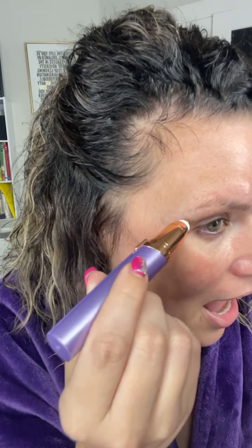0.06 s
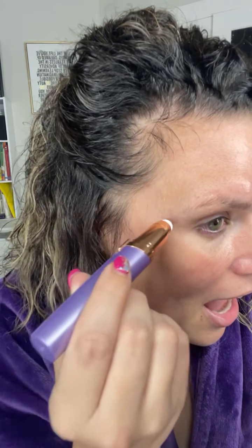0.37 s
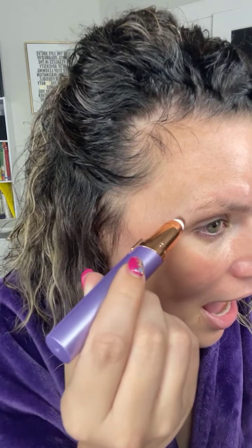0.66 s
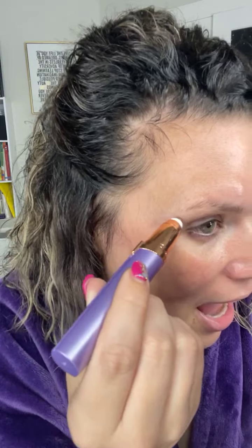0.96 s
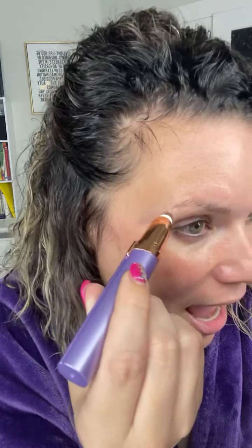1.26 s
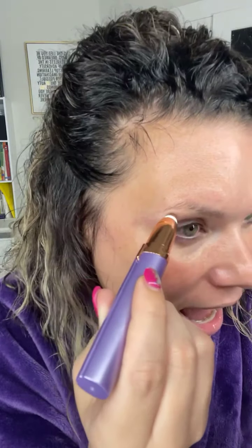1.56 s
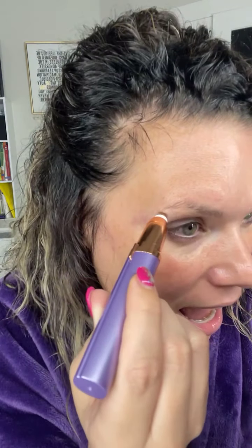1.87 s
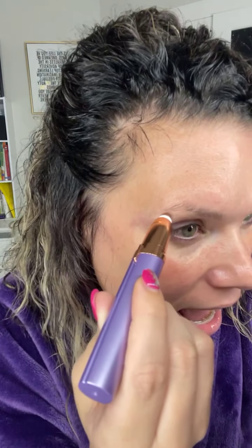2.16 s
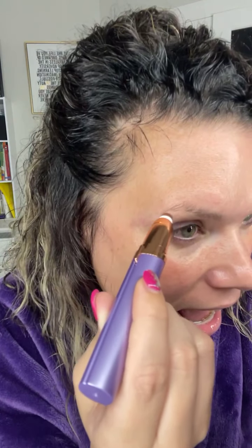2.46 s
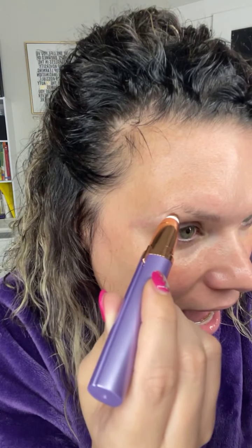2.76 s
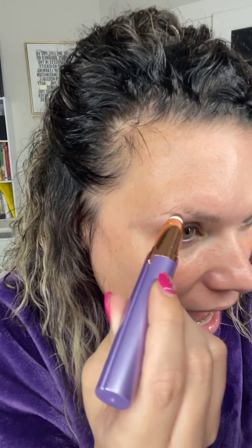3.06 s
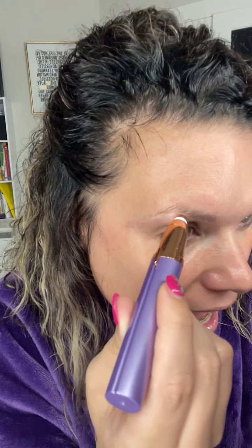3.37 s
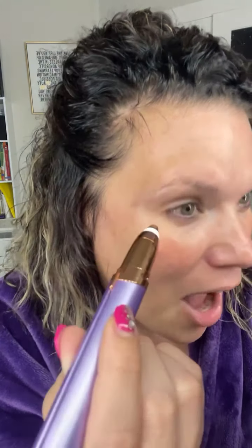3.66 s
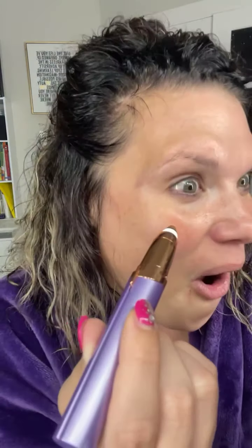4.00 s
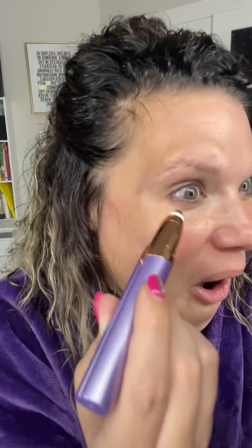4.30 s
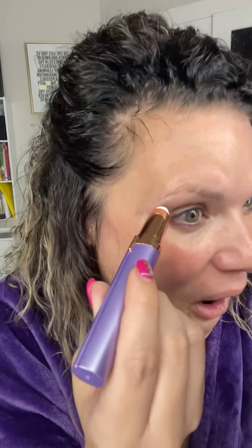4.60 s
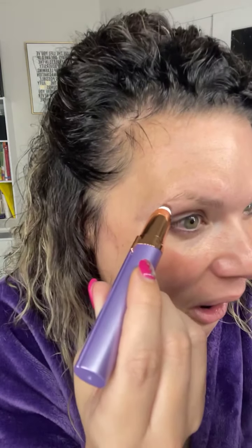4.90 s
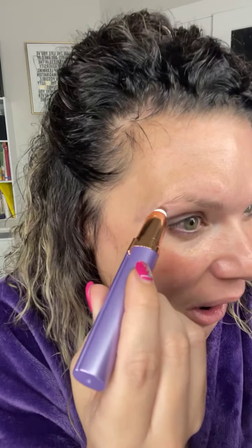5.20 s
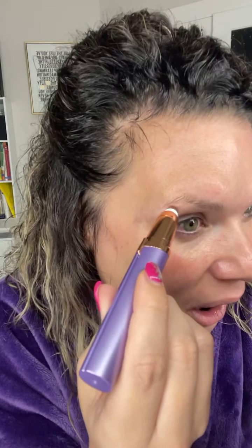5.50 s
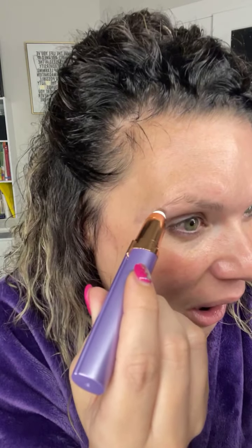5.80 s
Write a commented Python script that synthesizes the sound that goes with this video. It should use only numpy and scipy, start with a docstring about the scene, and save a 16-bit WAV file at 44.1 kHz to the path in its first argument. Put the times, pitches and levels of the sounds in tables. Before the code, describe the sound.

A small battery eyebrow trimmer runs close to the microphone for the whole six seconds or so. Its motor makes a thin, high electric whine, topped by a bright, fine buzz of the cutter against its metal guard and a light ring from the plastic handle. Presses on the brow make the pitch sag slightly and the buzz turn scratchier, most clearly around 0.8, 1.5 and 3.2 seconds. The buzz grows brighter from about 1.1 seconds. Hairs catch with short, faint rasps near 0.8, 1.4, 2.7 and 3.2 seconds. From about 3.5 to 4.4 seconds the head lifts off the skin and rings a little more freely. It then settles back and runs evenly to the end, with one tiny dip near 5.5 seconds. Underneath lies only the very faint rumble and hum of a quiet room.

```python
"""Eyebrow trimmer, close up

A battery trimmer runs in a quiet room. Its motor turns about 132 times a second and sags with each
press on the brow. The motor's harmonics make a thin whine; the cutter ticks and scrapes against its
metal guard several times a turn, which gives the bright buzz. The plastic handle rings along and hairs
catch with a rasp. For about a second the head lifts off the skin and rings more freely."""
import sys
import numpy as np
from scipy import signal
from scipy.fft import rfft, irfft, next_fast_len
from scipy.io import wavfile
from scipy.ndimage import map_coordinates

SR = 44100
rng = np.random.default_rng(int(sys.argv[2]) if len(sys.argv) > 2 else 0)


def wav_record(signal):
    """Record a signal, one row per channel, as 16-bit PCM in the file named by sys.argv[1]."""
    frames = np.transpose(np.atleast_2d(signal))
    bounded = np.clip(frames, -1, 1)
    # unit amplitude maps onto the largest positive 16-bit level
    quanta = np.round(bounded * 32767).astype(np.int16)
    wavfile.write(sys.argv[1], SR, quanta)


N = 257984
TIME = np.arange(N) / SR


def amp(db):
    """Decibels to gain."""
    return 10 ** (np.asarray(db) / 20)


def unit(x):
    """x at rms 1."""
    return x / np.sqrt(np.mean(x ** 2) + 1e-20)


def curves(rows):
    """One value per sample for each column after the time."""
    times, *columns = np.transpose(rows)
    return [np.interp(TIME, times, column) for column in columns]


def wobble(rate):
    """A smooth random curve, rate knots a second."""
    coarse = np.arange(0, N + 64, 64)
    knots = rng.standard_normal(1024)
    return np.interp(np.arange(N), coarse, map_coordinates(knots, [coarse * rate / SR], mode="wrap"))


def filtered(x, response):
    """x through an EQ whose gain is response(Hz)."""
    size = next_fast_len(N + SR // 4)
    return irfft(rfft(x, size) * response(np.fft.rfftfreq(size, 1 / SR)), size)[:N]


def coloured(x, points):
    """x shaped by (Hz, dB) points, at rms 1."""
    point_hz, db = np.transpose(points)
    return unit(filtered(x, lambda hz: amp(np.interp(np.log(hz + 1), np.log(point_hz), db))))


def band(x, lo_hz, hi_hz, order=40):
    """The part of x between two edges, at rms 1."""
    below = lambda hz, edge: 1 / (1 + (hz / edge) ** order)
    return unit(filtered(x, lambda hz: below(hz, hi_hz) - below(hz, lo_hz)))


def pulses(at, sizes):
    """Impulses at positions that fall between samples."""
    taps = np.floor(at)[:, None] + np.arange(-7, 9)
    offset = taps - at[:, None]
    shape = np.sinc(offset) * np.cos(np.pi * offset / 16) ** 2
    return np.bincount(np.clip(taps, 0, N - 1).astype(int).ravel(), (sizes[:, None] * shape).ravel(), N)


def rise(depth_db=1.5, length_s=2):
    """Gain that climbs gently at the start, then stays at 1."""
    return amp(-depth_db * np.clip(1 - TIME / length_s, 0, 1))


def swells():
    """Slow swells of the buzz and its treble, in dB about their means."""
    # Each row: time in seconds, buzz in dB, treble in dB.
    levels = [(0.0, -29.5, -36), (0.23, -30, -32.5), (0.34, -30, -33.5), (0.42, -28, -33),
              (0.76, -30.5, -35.5), (1.06, -30, -34.5), (1.11, -29, -31.5), (1.21, -29.5, -30.5),
              (3.18, -29, -28.5), (3.28, -29.5, -30.5), (3.73, -28, -28), (4.62, -29, -29),
              (5.72, -28.5, -29.5), (5.8, -28.5, -29)]
    return [db - db.mean() for db in curves(levels)]


def room(level_db, hum_db, hum_hz, swell_db):
    """Low room rumble with a faint mains hum."""
    # The room tone. Each row: frequency in Hz, relative level in dB.
    colour = [(20, -30), (38, -25), (52, -19), (75, -12.5), (95, -0.5), (115, -6), (150, -14), (220, -17.5),
              (450, -19.5), (900, -18.5), (3000, -27), (15000, -43)]
    rumble = amp(level_db + swell_db * wobble(4.83)) * coloured(rng.standard_normal(N), colour)
    hum = np.sqrt(2) * np.sin(2 * np.pi * hum_hz * TIME)
    return rumble + amp(hum_db) * hum


def rubbing(angle, colour, swell_db):
    """Friction noise that swells once a turn."""
    return coloured(rng.standard_normal(N) * amp(-swell_db * np.cos(2 * np.pi * angle)), colour)


def hairs(angle):
    """Short rasps as the cutter chews through a hair."""
    # Hairs catching. Each row: centre in seconds, half length in seconds, peak level in dB.
    catches = [(0.821, .06, -55), (1.396, 0.037, -50), (2.661, 0.019, -49), (3.215, .016, -47),
               (3.273, 0.042, -52), (4.142, 0.024, -64)]
    # Their rasp. Each row: frequency in Hz, relative level in dB.
    colour = [(400, -26), (900, -12), (1300, 0), (1900, 7), (3000, -1), (4500, 5), (8000, -12)]
    envelope = sum(amp(db) * np.exp(-((TIME - centre) / half) ** 2) for centre, half, db in catches)
    return envelope * rubbing(angle, colour, swell_db=-1)


def handle(angle, load, level_db, load_db, with_treble, waver_db):
    """Friction rings the plastic handle, harder under load and when the head rattles brightly."""
    # The plastic's resonance. Each row: frequency in Hz, relative level in dB.
    colour = [(500, -29.5), (1000, -14.5), (1300, 4.5), (1500, -0.5), (1800, -4), (2200, -9.5),
              (2700, -8.5), (3500, -19.5)]
    _, treble_db = swells()
    gain = amp(level_db + load_db * load + with_treble * treble_db + waver_db * wobble(9))
    return gain * rubbing(angle, colour, swell_db=3.5)


def shaft(full_sag, flutter, wander):
    """Motor angle in turns and load from 0 to 1; presses slow it. Settings are in turns a second."""
    # The free-running motor. Each row: time in seconds, speed in turns a second.
    speeds = [(0.0, 132.37), (0.56, 132.73), (1.2, 132.42), (2.37, 132.7), (2.69, 131.75), (4.02, 131.44),
              (4.23, 131.97), (4.29, 131.36), (4.65, 132.52), (5.85, 132.27)]
    # Presses on the brow. Each row: centre in seconds, half length in seconds, sag in turns a second.
    presses = [(0.041, 0.095, 1.18), (0.286, 0.071, 0.76), (0.846, 0.13, 2.9), (1.035, 0.067, 0.79),
               (1.449, 0.051, 1.55), (1.548, 0.091, 0.9), (1.761, 0.045, 1.64), (1.976, 0.06, 1.05),
               (2.146, 0.089, 0.97), (2.673, 0.02376, 0.912), (3.15, 0.027, 0.91), (3.251, 0.038, 2.18),
               (3.324, 0.087, 1.09), (5.511, 0.03, 0.95)]
    cruise, = curves(speeds)
    sag = sum(depth * np.exp(-((TIME - centre) / half) ** 2) for centre, half, depth in presses)
    speed = cruise - sag + flutter * wobble(30) + wander * wobble(9)
    return np.cumsum(speed) / SR, np.clip(sag / full_sag, 0, 1)


def harmonics(angle, table, waver_db, waver_rad):
    """Clean multiples of the shaft speed; each wavers as the hand moves the handle."""
    tones = np.zeros(N)
    for multiple, db in table:
        gain = amp(db + waver_db * wobble(5.025))
        phase = 2 * np.pi * (round(multiple) * angle + rng.random())
        tones += gain * np.sin(phase + waver_rad * wobble(3.9))
    return np.sqrt(2) * tones


def whine(angle, load, lift, load_db, motor_db, cutter_db, lift_db):
    """The motor's and the cutter's tones; a hard press ducks them and brings up lower ones."""
    # Tones of the motor, of the guard singing with the cutter, and of the motor labouring.
    # Each row: multiple of the shaft speed, level in dB before the gains below.
    motor_tones = [(2, -79), (8, -78.5), (9, -64.5), (10, -61.5), (11, -56), (12, -52), (13, -63),
                   (15, -65), (16, -60), (17, -67.5), (19, -61), (20, -60.5), (21, -65), (23, -47.5),
                   (24, -53), (25, -55.5), (26, -57), (27, -49), (28, -49.5), (29, -45), (30, -47.5),
                   (31, -46), (32, -46), (34, -46.5), (37, -58), (38, -57), (39, -60), (42, -50), (43, -49),
                   (45, -46.5)]
    guard_tones = [(47, -55.5), (48, -53.5), (49, -52), (50, -48.5), (51, -49.5), (53, -52.5), (54, -55),
                   (56, -44.5), (57, -42.5), (58, -50), (59, -44.5), (61, -58), (62, -56), (63, -42.5),
                   (64, -47.5), (66, -58), (69, -58), (70, -60), (77, -56)]
    strain_tones = [(8, -70.5), (9, -59.5), (14, -70), (15, -62)]
    buzz_db, _ = swells()
    motor = amp(motor_db + lift_db * lift) * harmonics(angle, motor_tones, waver_db=2, waver_rad=0.22)
    cutter = amp(cutter_db + buzz_db) * harmonics(angle, guard_tones, waver_db=2, waver_rad=0.38)
    strain = load * harmonics(angle, strain_tones, waver_db=4, waver_rad=0.22)
    commutator = amp(-70 + 3 * lift) * np.sqrt(2) * np.sin(2 * np.pi * 6 * angle)  # six beats a turn
    duck = amp(load_db * load ** 2)
    return duck * (rise() * motor + cutter) + strain + rise() * commutator


def ticks(angle, load, jitter_s, drift_s, scatter_db, sway_db, t60):
    """Each contact strikes once a turn with a short metal ring that changes colour now and then."""
    # Where the cutter touches the guard. Each row: share of a turn, relative level in dB.
    contacts = [(0.218, -3), (0.288, -2.5), (.45, -2.5), (0.562, -8.5), (0.678, -10.5), (0.758, -1),
                (.95, -4.5)]
    # Times in seconds at which the ticks' metallic ring changes colour.
    ring_change_times = [1.09, 1.45, 2.15, 2.7, 3.35, 4.4, 5.45]
    # The metal's tone. Each row: frequency in Hz, relative level in dB.
    colour = [(1800, -46), (2700, -28.5), (3300, -14.5), (4400, -14.5), (5000, -9), (5600, -12.5),
              (6600, -2), (7700, 1.5), (8600, 0.5), (9500, -5), (10800, -8), (12500, -6.5), (13300, -5.5),
              (15500, -6.5)]
    ring_time = np.arange(SR // 50) / SR
    strikes = np.zeros(N)
    for share, db in contacts:
        at = np.interp(np.arange(int(angle[-1])) + share, angle, np.arange(N))
        sample = at.astype(int)
        late, size, blur = rng.standard_normal((3, 1024))[:, :len(at)]
        jitter = jitter_s * (1 + 2 * load[sample]) * late  # load makes the timing ragged
        at = at + SR * (jitter + drift_s * wobble(3)[sample])
        sizes = amp(db + scatter_db * size + sway_db * wobble(2.47)[sample])
        # Around each change the ticks flicker between the two rings.
        ring_index = np.searchsorted(ring_change_times, at / SR + 0.038 * blur)
        for index in np.unique(ring_index):
            ring = rng.standard_normal(len(ring_time)) * amp(-60 * ring_time / t60)
            chosen = ring_index == index
            strikes += signal.oaconvolve(pulses(at[chosen], sizes[chosen]), unit(ring))[:N]
    return coloured(strikes, colour)


def lifted(leave_s, return_s, move_s):
    """0 while the head is on the skin, 1 while it is held clear."""
    return np.clip(np.minimum(TIME - leave_s, return_s - TIME) / move_s + 0.5, 0, 1)


def head(angle, load, lift, scrape_db, load_db, clear_db, flicker_db):
    """Ticks and scraping ring the guard; pressing trades ticks for scraping, lifting eases it."""
    # The scrape. Each row: frequency in Hz, relative level in dB.
    colour = [(1500, -23), (2300, -22), (3000, -13.5), (3900, -6.5), (5400, -10), (6600, -3), (7600, 7),
              (8400, 3), (9600, -2), (10700, -4), (13400, -1), (15500, -4)]
    # Bands in which the head rings. Each row: lower edge in Hz, upper edge in Hz, level in dB,
    # dB per dB of buzz, dB per dB of treble, change in dB when lifted.
    ring_bands = [(1460, 4570, -43.5, 0.6, 0, 1.5), (4614, 6280, -39.5, 0.9, -0.5, 1),
                  (6450, 7030, -41.5, -0.2, -0.12, 4), (7115, 8800, -33.5, 1.3, 0.38, -0.2),
                  (8936, 17250, -29.7, 0.5, 0.83, 0.5)]
    strikes = ticks(angle, load, jitter_s=6e-6, drift_s=1.8e-5, scatter_db=2, sway_db=2, t60=0.0091)
    scrape_gain = amp(scrape_db + load_db * load + clear_db * lift)
    scrape = scrape_gain * rubbing(angle, colour, swell_db=1.5)
    drive = (strikes + scrape) / np.sqrt(1 + scrape_gain ** 2)  # equal-power blend
    buzz_db, treble_db = swells()
    buzz = np.zeros(N)
    for lo_hz, hi_hz, db, with_buzz, with_treble, lift_db in ring_bands:
        band_db = db + with_buzz * buzz_db + with_treble * treble_db + lift_db * lift
        buzz += amp(band_db + flicker_db * wobble(35)) * band(drive, lo_hz, hi_hz)
    return buzz


def scene():
    """One motor drives the whole trimmer, over a bed of room tone."""
    angle, load = shaft(full_sag=2.5, flutter=0.069, wander=0.064)
    lift = lifted(leave_s=3.46, return_s=4.36, move_s=0.1)
    trimmer = (whine(angle, load, lift, load_db=-3.5, motor_db=-1.62, cutter_db=-1.75, lift_db=0.6)
               + head(angle, load, lift, scrape_db=-1.0, load_db=5.5, clear_db=-0.5, flicker_db=0.83)
               + handle(angle, load, level_db=-54.0, load_db=2.5, with_treble=0.64, waver_db=0.5)
               + hairs(angle))
    bed = rise() * room(level_db=-61, hum_db=-70.5, hum_hz=119.4, swell_db=1.54)
    return (trimmer + bed)[None]


def record(dry):
    """A brick-wall low-pass takes off the very top."""
    return filtered(dry[0], lambda hz: hz < 15780)[None]


dry = scene()
out = record(dry)
wav_record(out)
```